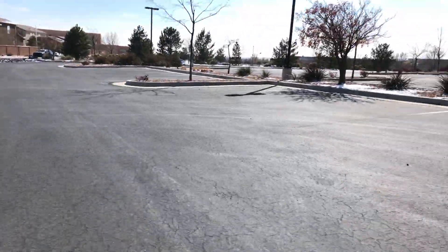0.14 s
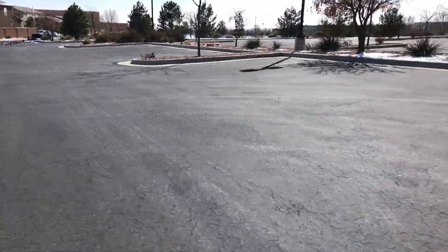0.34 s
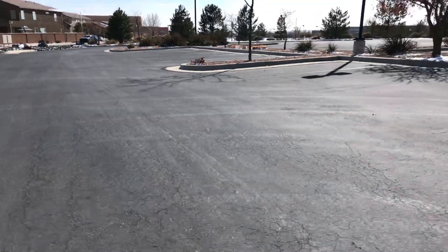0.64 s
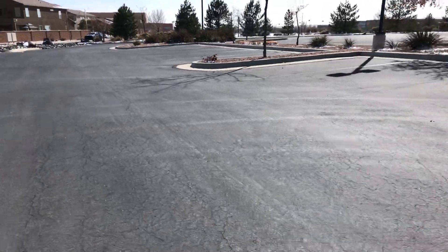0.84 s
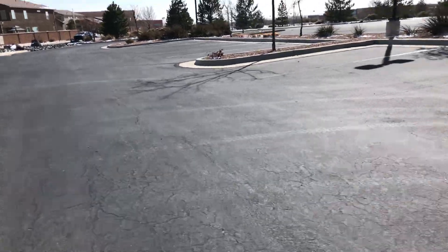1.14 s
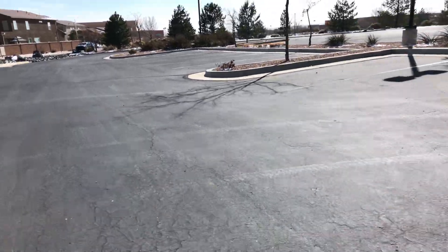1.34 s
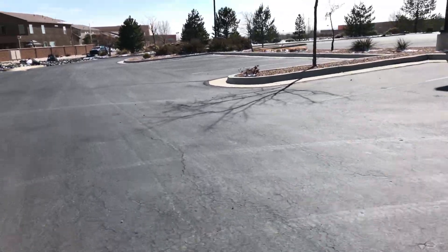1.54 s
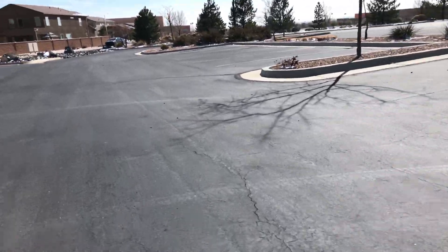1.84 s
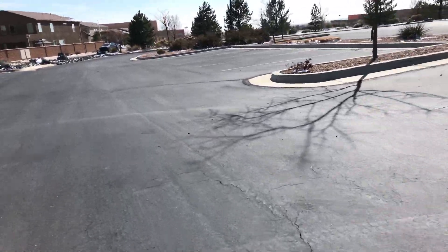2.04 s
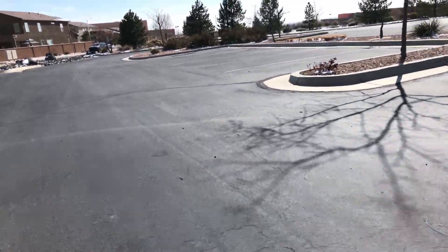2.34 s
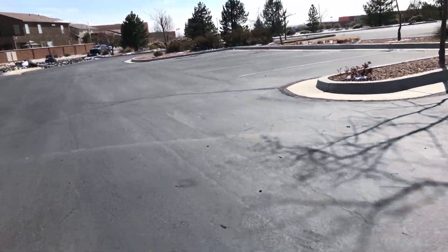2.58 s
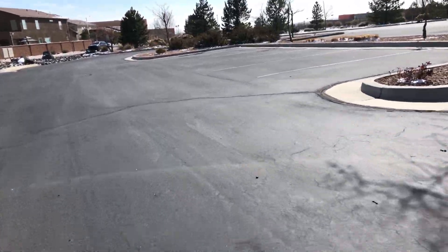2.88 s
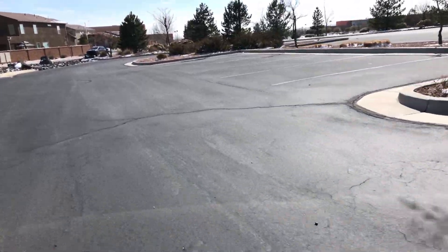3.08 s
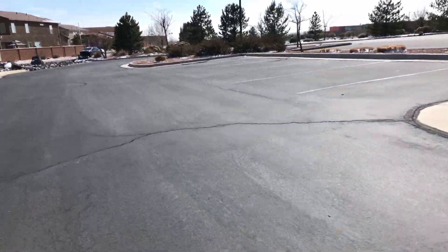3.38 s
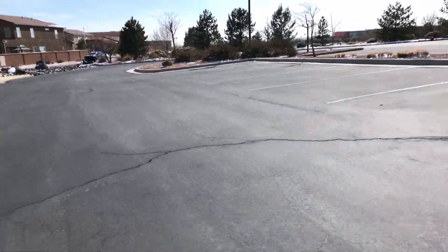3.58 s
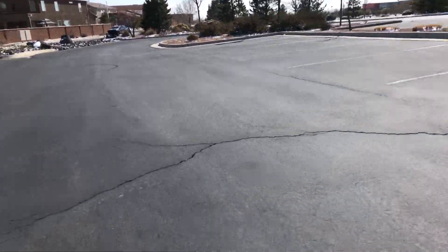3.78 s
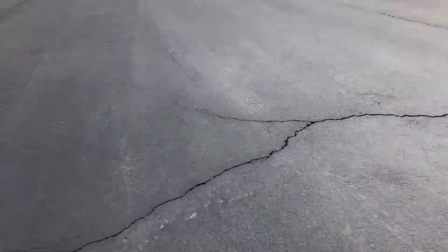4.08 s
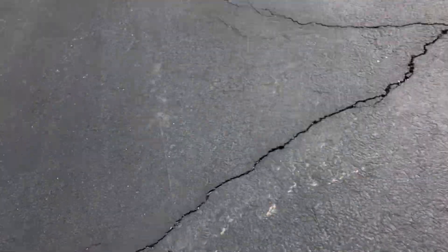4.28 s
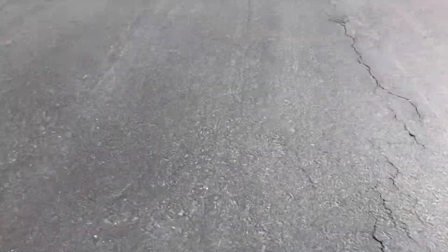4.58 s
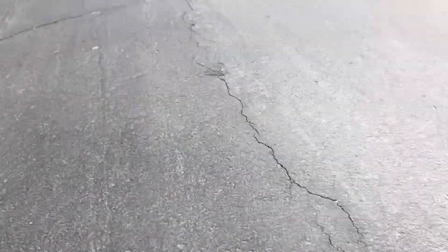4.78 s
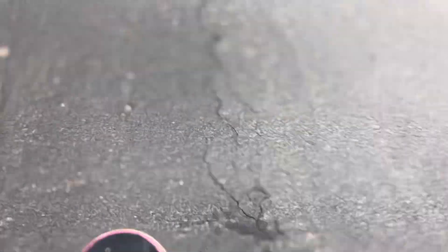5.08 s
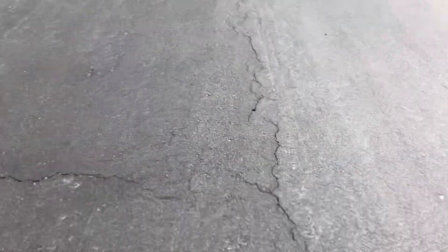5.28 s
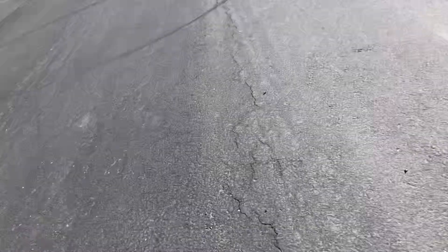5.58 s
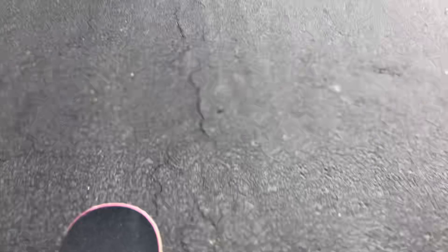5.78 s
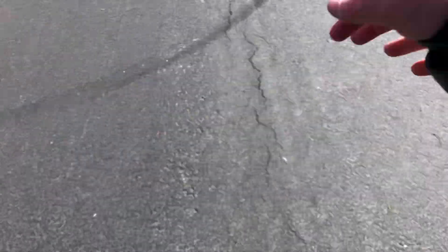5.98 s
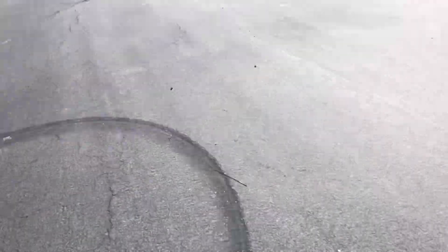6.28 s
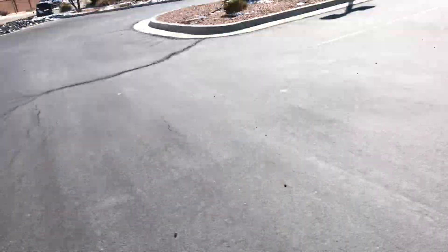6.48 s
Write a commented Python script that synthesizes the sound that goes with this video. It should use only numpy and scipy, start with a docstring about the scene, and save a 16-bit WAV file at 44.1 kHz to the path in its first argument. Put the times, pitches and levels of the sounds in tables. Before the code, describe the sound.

Skateboard wheels rumble steadily over rough cracked asphalt outdoors, with hollow wooden knocks, then a brighter, rattlier roll with sharp stone ticks and bumps.

```python
"""Skateboard on rough asphalt

A skateboard rolls over rough, cracked asphalt, heard from a microphone in the rider's hand.
Random stone contacts shake resonances of the wooden deck, wheels, axles and trucks; cracks knock the deck.
Small stones tick as short decaying tones, and lumpy low noise makes the wind at the microphone port.
Later the microphone is turned down towards the board, and the sound grows brighter."""
import sys
import numpy as np
from scipy import signal
from scipy.fft import rfft, irfft
from scipy.io import wavfile

SR = 44100
rng = np.random.default_rng(int(sys.argv[2]) if len(sys.argv) > 2 else 0)


def how_loud(loudness_db):
    """Turn decibels into a plain amplitude multiplier (0 dB gives 1, 20 dB gives 10)."""
    steps = np.asarray(loudness_db, float) / 20
    return 10 ** steps


def put_to_file(sound):
    """Save the sound as 16-bit audio at rate SR, in the file named by the first command-line argument."""
    columns = np.atleast_2d(sound).T  # one column per channel
    safe = np.clip(columns, -1, 1)
    whole_steps = np.round(safe * 32767)
    wavfile.write(sys.argv[1], SR, whole_steps.astype(np.int16))


N = 292383   # length in samples


def rms_one(x):
    """Scale to an rms (average strength) of 1."""
    return x / np.sqrt(np.mean(x ** 2) + 1e-20)


def in_time(rows):
    """Draw straight lines between the rows of a table, one curve for each column after the time."""
    s, *columns = np.transpose(rows)
    return [np.interp(np.arange(N) / SR, s, column) for column in columns]


def swells(rows):
    """Smooth rise and fall in dB around the middle of each event."""
    out = np.zeros(N)
    for s, length_s, db in rows:
        first = max(0, round((s - length_s / 2) * SR))
        last = min(N, round((s + length_s / 2) * SR))
        i = np.arange(first, last)
        out[i] += db * np.cos(np.pi * (i / SR - s) / length_s) ** 2
    return out


def drift(rate_hz):
    """Slow random wandering of spread 1: noise twice through a one-pole low-pass."""
    r = np.exp(-2 * np.pi * rate_hz / SR)
    noise = rng.standard_normal(N + SR)
    settled = signal.lfilter([1], [1, -2 * r, r * r], noise)[SR:]   # skip the filter's first second
    return rms_one(settled)


def resonance(x, hz, width_hz):
    """Two-pole resonance with gain 1 on top."""
    r = np.exp(-np.pi * width_hz / SR)
    poles = [1, -2 * r * np.cos(2 * np.pi * hz / SR), r * r]
    return signal.lfilter([(1 - r * r) / 2, 0, (r * r - 1) / 2], poles, x)


def high_pass(x, hz):
    """Gentle filter that keeps what lies above a pitch."""
    return signal.sosfilt(signal.butter(2, hz, "high", fs=SR, output="sos"), x)


def lift(x, centre_hz, lift_db, width_hz):
    """A gliding peak (or dip), cross-faded along a row of fixed resonances."""
    out, step = x.copy(), width_hz / 2
    for hz in np.arange(centre_hz.min() - step, centre_hz.max() + step, step):
        share = np.clip(1 - np.abs(centre_hz - hz) / step, 0, 1)
        out += share * (how_loud(lift_db) - 1) * resonance(x, hz, width_hz)
    return out


# Tone of the wind. Each row: pitch in Hz, relative level in dB.
WIND = [(18, -46), (30, -28), (52, -7), (129, -3), (200, -2.5), (260, -19), (440, -120)]
# Gusts (+) and lulls (-). Each row: middle in seconds, length in seconds, change of level in dB.
GUSTS = [(.01, 0.04, 3), (.2, 0.26, 1), (.38, 0.19, 15), (.65, 0.15, 9.5), (.83, 0.13, 4),
         (1.0, 0.15, 10.5), (1.14, 0.11, 10), (1.41, 0.095, 8), (1.68, 0.068, 7), (1.83, 0.29, 8),
         (1.965, 0.15, 11.5), (2.15, 0.62, 3.5), (3.99, 0.073, 12), (4.14, 0.24, 12.5), (4.31, 0.094, 10),
         (4.65, 0.32, 5), (4.82, 0.088, 9), (5.06, 0.12, -16), (5.15, 0.086, 5), (5.26, .1, 3),
         (5.4, 0.69, 8), (5.59, 0.081, 6), (5.77, 0.084, -20), (5.83, 0.19, 8.5), (5.95, 0.13, 10.5),
         (6.17, 0.64, 8), (6.4, 0.073, 10.5), (6.61, 0.14, 12)]


def wind():
    """Lumpy low noise of air tumbling over the microphone port."""
    breeze_db = -30.5   # rms level before gusts and lulls
    hz, db = np.transpose(WIND)
    lumps = rng.standard_normal(N) * how_loud(1.35 * drift(28.0))
    log_hz = np.log(np.fft.rfftfreq(N, 1 / SR) + 1)
    shape = how_loud(np.interp(log_hz, np.log(hz), db, right=-90))
    return how_loud(breeze_db + swells(GUSTS)) * rms_one(irfft(rfft(lumps) * shape, N))


# Wheels over small cracks and loose stones. Each row: start in seconds, relative level in dB, pitch in Hz.
TICKS = [(0.747, -14, 1900), (0.7478, -28, 3800), (0.7535, -20, 2300), (0.7926, -23, 3900),
         (2.2677, -26, 4200), (2.575, -24, 4300), (4.2657, -27, 6200), (4.4262, -11, 4300),
         (4.446, -10, 4350), (4.5461, -13, 4450), (4.725, -17, 3300), (4.8447, -18, 2600),
         (5.032, -4, 1570), (5.033, -17, 2380), (5.033, -22, 4700), (5.1093, -23, 2190), (5.152, -11, 3170),
         (5.1535, -7, 6050), (5.163, -15, 4300), (5.182, -10, 2600), (5.184, -19, 7000), (5.199, -9, 2200),
         (5.212, -10, 4900), (5.222, -18, 6000), (5.228, -12, 4200), (5.249, -18, 4000),
         (5.5604, -12, 2400), (5.6491, -21, 4400), (5.696, -20, 4600), (5.752, -16, 4200),
         (5.7645, -10.5, 4250), (5.771, -18, 4300), (5.7843, -23, 3100), (5.8137, -5, 3000),
         (5.8138, 0.5, 5800), (5.8138, -20, 14500), (5.846, -16, 3000), (5.877, -5.5, 2600),
         (5.8795, -13, 4800), (5.897, -14, 5000), (5.9638, -15, 4570), (5.9963, -14, 4550),
         (6.108, -31, 4430), (6.361, -12, 2100)]


def ticks():
    """Each stone gives a short bright tick and a brief burst of rattle."""
    out, t = np.zeros(N + SR), np.arange(SR // 20) / SR
    noise = rng.standard_normal((len(TICKS), len(t)))
    for (s, db, hz), hiss in zip(TICKS, noise):
        ring_s = 0.00031 * max(1, 3600 / hz)      # duller stones ring longer
        rise_and_fall = (t / (2 * ring_s)) * np.exp(1 - t / ring_s)
        tick = np.sin(2 * np.pi * hz * t) * rise_and_fall
        rattle = resonance(resonance(hiss, hz, 4500), hz, 4500)
        burst = how_loud(-7.5) * rattle * np.exp(-t / 0.0022)
        out[round(s * SR):][:len(t)] += how_loud(db) * (tick + burst)
    return out[:N]


# Resonances of the wooden deck. Each row: pitch in Hz, width in Hz,
# relative level in dB with the microphone aimed ahead, relative level in dB aimed down.
DECK = [(204.5, 104, -2, -16), (298.8, 69.7, -3, -1.5), (463, 94, -2.5, -3), (545.4, 70, -3.5, 1),
        (622, 57, -3, 0.5), (700, 70, -1.5, -17)]
# The deck's overtones. Each row: pitch in Hz, width in Hz, relative level in dB aimed ahead, in dB aimed down.
OVERTONES = [(808, 140, -3, 2.5), (993, 183, -9.5, 3.9)]
# Jolts that knock the deck. Each row: start in seconds, relative level in dB.
KNOCKS = [(0.153, 7.5), (0.28, 5), (0.473, 5), (0.745, 6), (0.7535, 2), (0.93, 3), (0.946, 2), (1.942, 6),
          (2.606, 1), (4.429, 2), (4.495, 0.5), (3.604, -1), (4.787, -1), (4.887, 2), (4.986, 6),
          (5.1305, 10), (5.226, 9.5), (5.2555, 8.5), (5.563, 3), (5.6518, 10.5), (5.751, -2), (5.812, 7),
          (5.834, 1), (5.88, 8), (6.548, 3)]


def knocks():
    """A short blow rings the deck, with new strengths each time; the rider's weight damps it fast."""
    knock_db, centre_hz, fall_db_per_octave = -11.5, 600, 12
    rise_s, decay_s = .0015, .008
    out, t, modes = np.zeros(N + SR), np.arange(SR // 20) / SR, DECK + OVERTONES
    strengths_db = rng.normal(0, 4.1, (len(KNOCKS), len(modes)))
    shape = np.exp(-t / decay_s) * (1 - np.exp(-t / rise_s))
    for (s, db), row in zip(KNOCKS, strengths_db):
        ring = np.zeros(len(t))
        for (hz, _, ahead_db, _), own_db in zip(modes, row):
            fall_db = fall_db_per_octave * abs(np.log2(hz / centre_hz))
            ring += how_loud(ahead_db + own_db - fall_db) * np.sin(2 * np.pi * hz * t)
        ring *= shape
        out[round(s * SR):][:len(t)] += how_loud(db + knock_db) * ring / np.abs(ring).max()
    return out[:N]


def dips_at_knocks():
    """Around the start of each knock the deck's rolling noise dips briefly, so the knock stands out (in dB)."""
    depth_db, before_s, width_s = -9, .004, .005
    t, dip_db = np.arange(N) / SR, 0
    for s, _ in KNOCKS:
        dip_db = dip_db + depth_db * np.exp(-((t - s + before_s) / width_s) ** 2)
    return dip_db


def jolts(per_s, spread_db):
    """Sizes of random stone contacts, a few much larger than the rest."""
    size = how_loud(spread_db * np.minimum(rng.exponential(1, N), 5))
    return size * (rng.random(N) < per_s / SR)


def body(contacts, modes, aim, patchy_db, smooth):
    """The same contacts shake every resonance, with random signs and a share of smooth noise."""
    out, power = 0, 0
    for hz, width_hz, ahead_db, down_db in modes:
        hits = rms_one(contacts) * rng.choice([-1, 1], N)
        shaken = hits + smooth * (1 + (hz / 9000) ** 2) * rng.standard_normal(N)
        for _ in range(3):   # steep skirts keep the valleys between resonances dark
            shaken = resonance(shaken, hz, 2 * width_hz)
        gain = how_loud(ahead_db + aim * (down_db - ahead_db)) * np.sqrt(width_hz)
        patches = how_loud(patchy_db * (0.2 * drift(23.0) + drift(35.0)))
        out = out + gain * patches * rms_one(shaken)
        power = power + gain ** 2
    return out / np.sqrt(power)


# Resonances of the wheels. Each row: pitch in Hz, width in Hz,
# relative level in dB with the microphone aimed ahead, relative level in dB aimed down.
WHEELS = [(1252, 243, 6, 3), (1550, 334, -9, -0.5)]
# Resonances of the axles. Each row: pitch in Hz, width in Hz, relative level in dB aimed ahead, in dB aimed down.
AXLES = [(2150, 336, 2, 3.5), (2600, 610, -2, -6), (3000, 230, -3.5, 0)]
# Rattle of the trucks. Each row: pitch in Hz, width in Hz, relative level in dB aimed ahead, in dB aimed down.
TRUCKS = [(3385, 184, -3.5, 7), (3935, 470, 4, -2), (4300, 850, 2, -0.5), (5400, 1100, -5, -5.5),
          (6160, 460, 4, -3), (7000, 470, -4, -6), (7660, 1380, 0, -9), (8880, 710, -5.5, -5.5),
          (9440, 2270, 0, -14), (11100, 1900, -18, -18), (12250, 1600, -9, -14), (13600, 1400, -25, -19),
          (14900, 1200, -7, -18)]


def rolling(levels_db, aim):
    """Stones shake the board; rough patches swell wheels, axles and rattle most, the deck least."""
    patches_db = 0.43 * drift(26.0) + 2.25 * drift(112.0)
    thuds, grit = jolts(2500, 2.4), jolts(9000, 2.87)
    dips = how_loud(dips_at_knocks())
    parts = [body(thuds * how_loud(0.2 * patches_db), DECK, aim, patchy_db=0.25, smooth=0.31) * dips,
             body(thuds * how_loud(0.38 * patches_db), OVERTONES, aim, patchy_db=0.0, smooth=0.34) * dips,
             body(thuds * how_loud(1.2 * patches_db), WHEELS, aim, patchy_db=0.2, smooth=0.37),
             body(grit * how_loud(1.07 * patches_db), AXLES, aim, patchy_db=2.2, smooth=0.32),
             body(grit * how_loud(patches_db), TRUCKS, aim, patchy_db=1.1, smooth=0.12)]
    return sum(how_loud(db) * part for db, part in zip(levels_db, parts))


# Loudness of the roll, set by speed and distance to the board. Each row: time in seconds, level in dB.
ROLL = [(0, -14.5), (.33, -13.5), (.6, -15.5), (1.05, -16), (1.6, -16), (2.1, -16.5), (2.9, -17),
        (3.6, -17), (4.0, -21), (4.2, -16), (4.52, -12), (4.68, -17), (4.93, -11), (5.07, -15), (5.26, -11),
        (5.37, -15.5), (5.55, -12.5), (5.7, -13), (5.98, -9), (6.15, -14), (6.63, -11.5)]
# Coarser (+) or smoother (-) road. Each row: middle in seconds, length in seconds, coarseness in dB.
STRETCHES = [(.63, 0.024, 8), (1.02, 0.26, 2.5), (1.15, 0.042, 0), (2.44, 0.095, 6.5), (2.855, 0.036, 8),
             (3.005, 0.032, 7.5), (3.19, 0.022, 8), (3.7, 0.18, -5), (3.79, 0.17, 4.5), (3.98, 0.2, 5),
             (4.26, 0.16, 9), (4.34, 0.2, -5.5), (4.46, 0.088, 5.5), (4.73, 0.069, 7.5), (5.115, .05, 8),
             (5.165, 0.08, 12), (5.218, 0.064, 10), (5.241, 0.014, -5), (5.65, 0.12, 2.5),
             (5.735, 0.023, -14), (5.845, 0.14, 5.5), (6.0, 0.039, 6), (6.08, .06, 4), (6.2, 0.065, 3),
             (6.3, 0.17, 4.5)]
# One row each for deck, overtones, wheels, axles, rattle. Each row: dB over the roll aimed ahead,
# dB over the roll aimed down, share of the coarseness felt, share of the clearer path.
PARTS = [(-0.5, 0.57, 0.26, 0.009), (-8, -14.5, 0.67, 0.18), (-15, -17.5, 0.31, 0.4),
         (-30, -30, 0.48, 0.62), (-27, -26, 0.69, 0.73)]
# The deck's hum briefly drops. Each row: middle in seconds, length in seconds, change in dB.
HUSHES = [(2.95, 0.044, -2), (4.33, 0.075, -2.5), (4.77, 0.015, -9), (5.246, 0.0079, -2), (5.74, 0.027, -8)]
# The band above the hum hollows out (-) or fills (+) as the microphone moves.
# Each row: middle in seconds, length in seconds, change in dB.
HOLLOWS = [(1.75, 0.23, 6), (3.84, .15, -2), (4.36, 0.51, -7.5), (4.55, 0.44, -7), (4.75, 0.35, -12),
           (4.97, 0.14, -5.5), (5.06, 0.21, -5), (5.22, 0.19, -9), (5.38, 0.16, -10), (5.63, 0.058, 5),
           (5.72, 0.18, -9), (5.79, 0.044, -2), (5.95, .08, -3), (6.04, 0.17, -7)]


def part_levels(aim, clear_db):
    """Level in dB of each part of the board, from the speed, the road and the microphone's aim."""
    roll_db, = in_time(ROLL)
    coarse_db = swells(STRETCHES)
    levels_db = []
    for ahead_db, down_db, felt, seen in PARTS:
        aimed_db = ahead_db + aim * (down_db - ahead_db)
        levels_db.append(roll_db + aimed_db + felt * coarse_db + seen * clear_db)
    deck, overtones, *metal = levels_db
    return [deck + swells(HUSHES), overtones + swells(HOLLOWS), *metal]


def near_echo(x, aim):
    """Turned down, the microphone hears more of a short echo off the rider; its wandering lag sweeps a comb."""
    lag = SR * 0.000576 * how_loud(3.03 * drift(0.99))   # in samples
    bright = high_pass(x, 1500)
    late = np.interp(np.arange(N) - lag, np.arange(N), bright)
    return x + 0.37 * aim * late


# A middle band swells (+) or sinks (-) and glides at each swing of the microphone.
# Each row: middle in seconds, length in seconds, start pitch in Hz, end pitch in Hz, change in dB.
SWINGS = [(.25, 0.94, 1690, 1750, 3.5), (1.4, 1.0, 1900, 2300, 3), (2.5, 0.99, 2700, 2700, -3.5),
          (3.98, 0.81, 2500, 3100, 5), (4.28, 0.1, 1300, 1500, 2), (4.376, 0.35, 2000, 2300, 9.5),
          (4.37, 0.2, 1400, 1650, 7), (4.608, 0.28, 1650, 1750, -3), (4.744, 0.9, 2400, 2680, 10),
          (4.984, .1, 2650, 2700, -9), (5.035, 0.49, 1250, 2000, 6.5), (5.177, 0.22, 2100, 2250, 8),
          (5.38, 0.41, 2500, 2700, 6), (5.643, 0.24, 1050, 1550, 6), (5.828, 0.29, 2000, 2130, 12.5),
          (6.472, 0.17, 2290, 2350, 6), (6.598, 0.043, 2150, 2150, 13.5)]


def swinging(x):
    """Each swing lifts or cuts a band that glides from its start pitch to its end pitch."""
    glide_share = .3   # the glide lasts this share of the swing on each side of its middle
    out, t = x.copy(), np.arange(N) / SR
    for s, length_s, start_hz, end_hz, db in SWINGS:
        near = np.abs(t - s) < length_s / 2
        half_s = glide_share * length_s
        centre_hz = np.interp(t[near], [s - half_s, s + half_s], [start_hz, end_hz])
        swell_db = swells([(s, length_s, db)])[near]
        out[near] = lift(out[near], centre_hz, swell_db, width_hz=380)
    return out


# One ring of the trucks stands out for a while. Each row: middle in seconds, length in seconds, lift in dB.
RINGING = [(3.85, 0.72, 5.1), (4.17, 0.11, 7.5), (4.7, 0.26, 8.1), (5.38, 0.25, 4), (6.1, 0.48, 4.6),
           (6.45, .3, 2.1)]


def ringing(x):
    """A resonance at a fixed pitch brings out one ring of the trucks."""
    return x + (how_loud(swells(RINGING)) - 1) * resonance(x, hz=4400, width_hz=460)


# Fixed bands of the rolling sound swell (+) or sink (-) for a moment.
# Each row: middle in seconds, length in seconds, pitch in Hz, change in dB.
SHADES = [(.25, .35, 7800, 4), (.25, .5, 6200, -4), (.4, .25, 12000, 5), (.27, .22, 210, 5),
          (5.52, .2, 1050, 3), (3.4, .8, 2800, 2), (4.35, .16, 3100, -6), (5.85, .12, 1000, 4),
          (4.66, .16, 1950, -7), (4.9, .14, 3400, 5), (4.9, .3, 3020, -6), (5.02, .16, 2750, -5),
          (5.5, .12, 640, 3), (5.66, .2, 300, -6), (5.69, .1, 560, 3), (5.79, .12, 580, 7),
          (5.78, .12, 300, -7), (5.5, .3, 1950, -4)]
# The echo off the road cancels a band that drifts with the microphone's height.
# Each row: time in seconds, pitch in Hz, change in dB (mostly a cut).
ROAD_NOTCH = [(0, 5400, -8), (.7, 5560, -8), (1.5, 5260, -6), (2.3, 5330, -6), (3.0, 5250, -9),
              (3.8, 5500, -3), (4.15, 5400, -3.5), (4.3, 5400, 2), (6.63, 5270, -2.5)]


def shading(x):
    """Fixed bands swell or sink for a moment; the road's echo mostly darkens a drifting band."""
    out = x.copy()
    for s, length_s, hz, db in SHADES:
        out += (how_loud(swells([(s, length_s, db)])) - 1) * resonance(x, hz, width_hz=0.13 * hz)
    return lift(out, *in_time(ROAD_NOTCH), width_hz=570)


def hand(x, cupping, hollow_hz):
    """The hand shades the top treble, and its hollow lifts a band that moves as the grip turns."""
    open_top_db, cupped_top_db = 1.5, -12.5
    open_lift_db, cupped_lift_db = 1, 6
    top_db = open_top_db + cupping * (cupped_top_db - open_top_db)
    lift_db = open_lift_db + cupping * (cupped_lift_db - open_lift_db)
    top = high_pass(x, 7000)
    low = signal.sosfilt(signal.butter(2, 7000, "low", fs=SR, output="sos"), x)
    shaded = low - how_loud(top_db) * top       # the two halves are opposite in sign where they meet
    return lift(shaded, hollow_hz, lift_db, width_hz=1040)


# The microphone in the hand. Each row: time in seconds, aim from 0 (ahead) to 1 (down at the board),
# cupping of the hand from 0 to 1, hollow of the hand in Hz, clearer path to the trucks in dB.
AIM = [(0, 0.086, .6, 8000, 2.5), (.18, 0.062, 0.4, 7740, 3), (.42, 0.16, 0.45, 7800, 4),
       (.52, 0.023, 0.53, 7750, 1.5), (1.5, 0.064, 0.6, 7650, 3), (2.3, .02, 0.35, 7800, -1.5),
       (3.6, 0.17, 0.22, 8000, -3.5), (3.85, 0.17, 0.6, 8160, 2), (4.1, 0.11, 0.85, 7000, 5),
       (4.3, 0.51, 0.5, 5960, 4), (4.5, 0.76, 0, 5200, 1.5), (4.65, 0.72, 0.1, 9300, 5),
       (5.05, 0.77, 0.5, 8950, 3.5), (5.3, 0.53, 0.54, 8600, 7.5), (5.45, 0.36, 0.85, 7000, 8),
       (5.6, 0.63, 0.36, 7000, 3), (5.72, 0.78, 0.44, 7000, 7), (5.95, 0.43, 0.6, 8600, 4),
       (6.15, 0.52, 0.4, 8760, 9), (6.3, 0.3, 0.5, 6150, 7), (6.45, 0.18, .45, 6250, 7),
       (6.63, 0.21, 0.3, 7300, 0)]


def scene():
    """All sources at the hand-held microphone."""
    aim, cupping, hollow_hz, clear_db = in_time(AIM)
    aim = np.clip(aim, 0, 1)
    board = rolling(part_levels(aim, clear_db), aim)
    board = swinging(near_echo(board, aim))
    board = ringing(board)
    held = hand(shading(board), cupping, hollow_hz)
    return (held + ticks() + knocks() + wind())[None]


def low_pass(x):
    """Removes everything above the highest recorded frequency."""
    return signal.sosfilt(signal.butter(12, 15780, fs=SR, output="sos"), x)


def record(dry):
    """The microphone hisses faintly at the top and drops the deepest bass; peaks are rounded, the top cut."""
    hiss = high_pass(rng.standard_normal(dry.shape), 9700)
    thin = high_pass(dry + how_loud(-72) * hiss, 33)
    rounded = np.tanh(thin / 1.33)
    top_cut = signal.cheby2(12, 60, 16600, fs=SR, output="sos")
    return low_pass(1.048 * signal.sosfilt(top_cut, rounded))


dry = scene()
out = record(dry)
put_to_file(out)
```